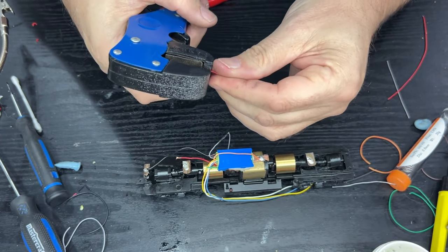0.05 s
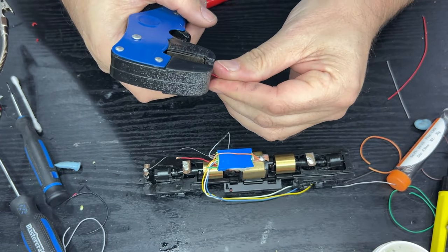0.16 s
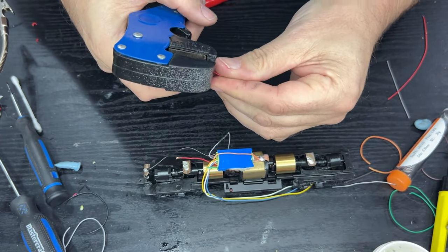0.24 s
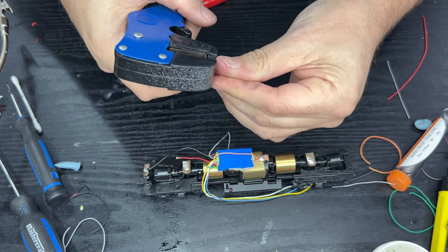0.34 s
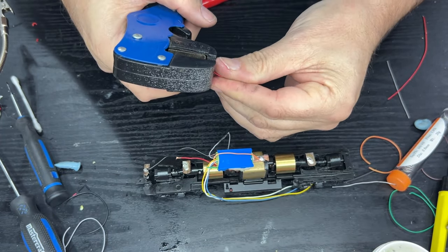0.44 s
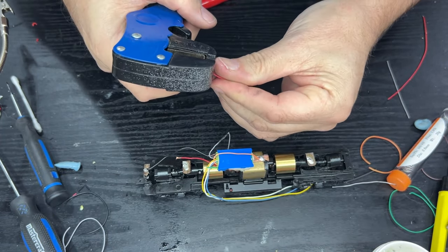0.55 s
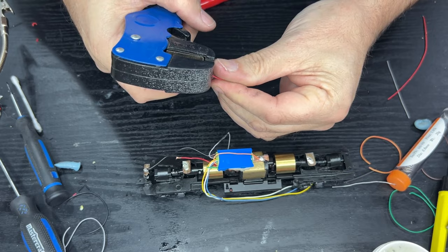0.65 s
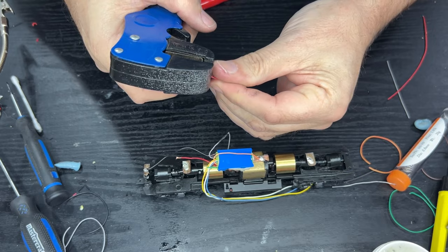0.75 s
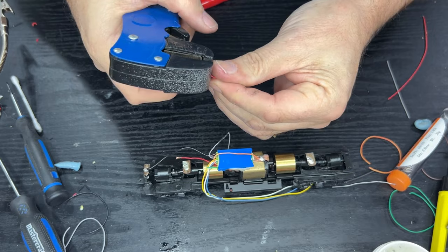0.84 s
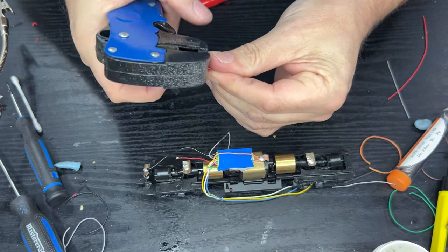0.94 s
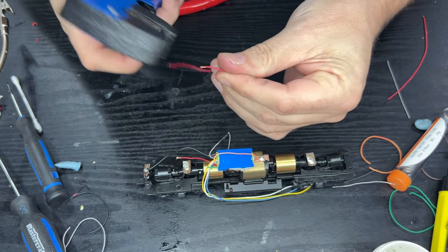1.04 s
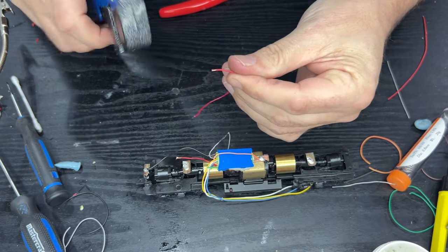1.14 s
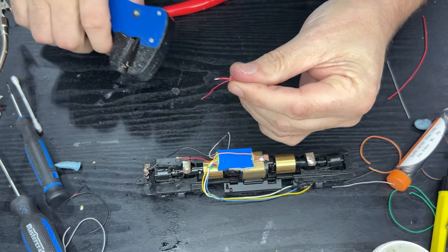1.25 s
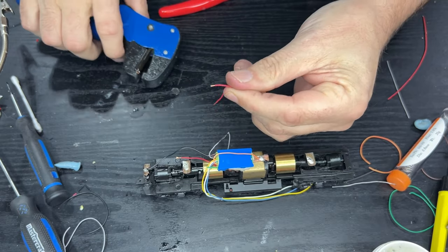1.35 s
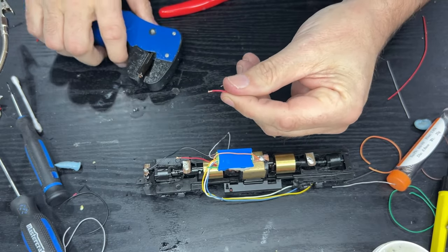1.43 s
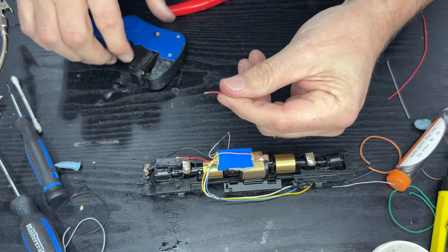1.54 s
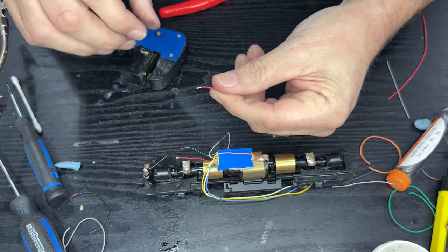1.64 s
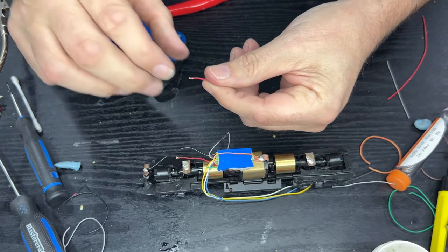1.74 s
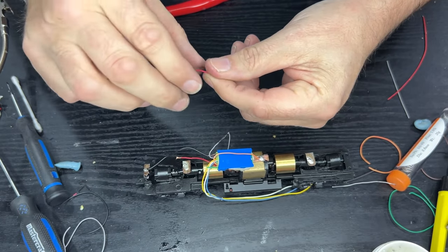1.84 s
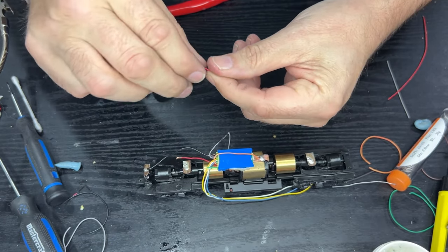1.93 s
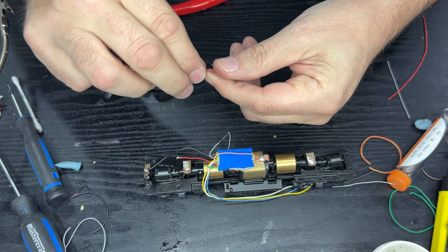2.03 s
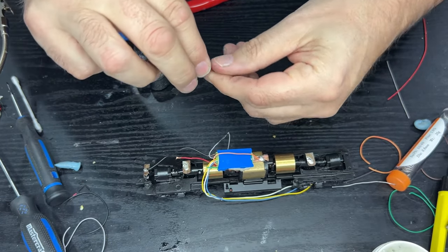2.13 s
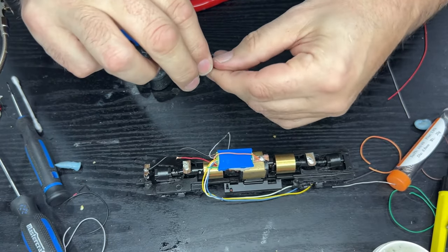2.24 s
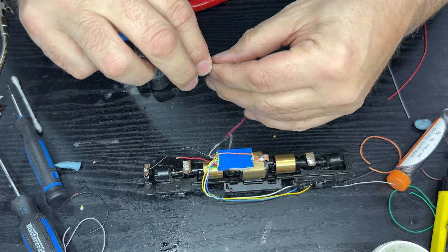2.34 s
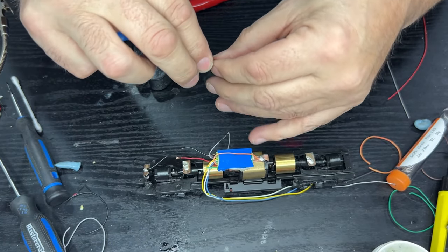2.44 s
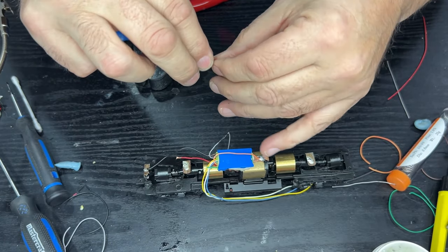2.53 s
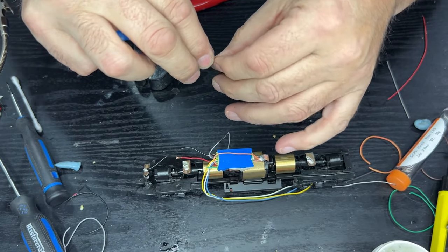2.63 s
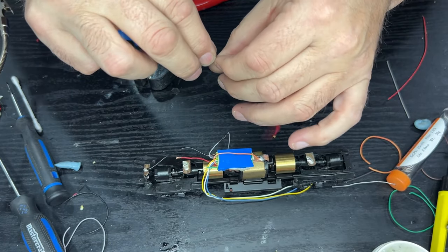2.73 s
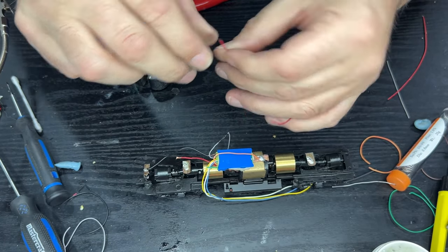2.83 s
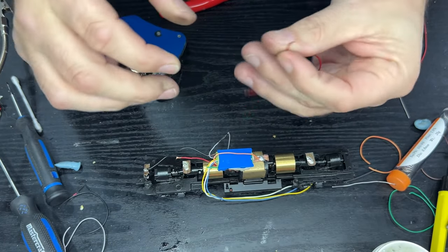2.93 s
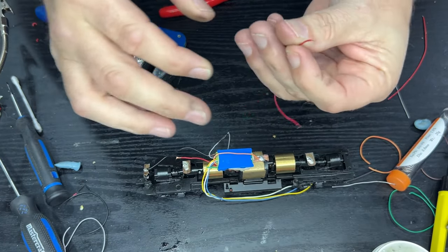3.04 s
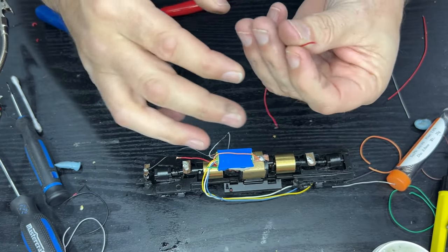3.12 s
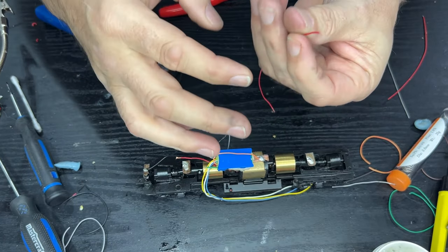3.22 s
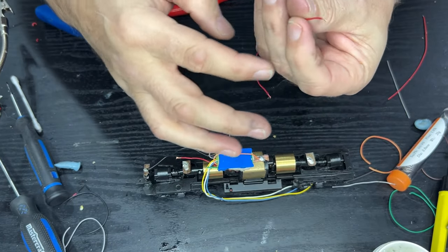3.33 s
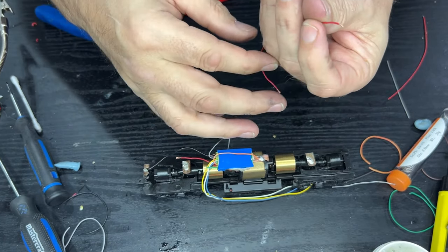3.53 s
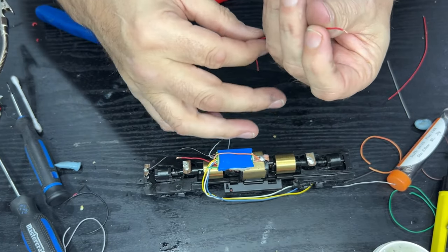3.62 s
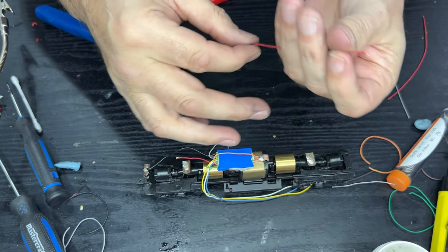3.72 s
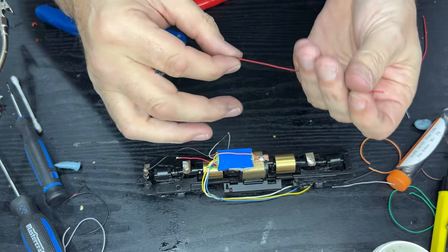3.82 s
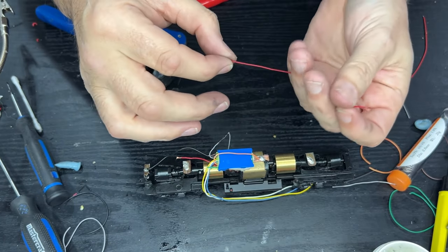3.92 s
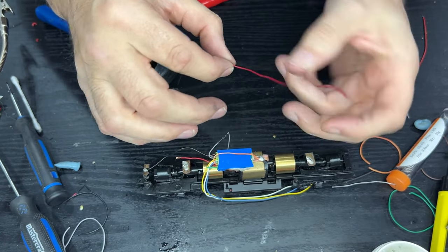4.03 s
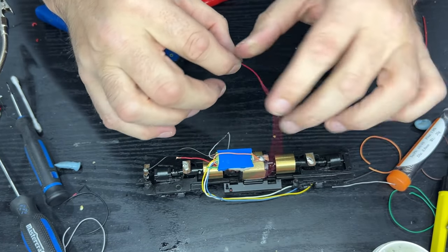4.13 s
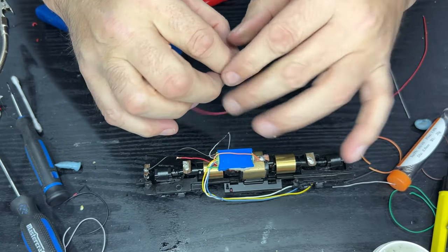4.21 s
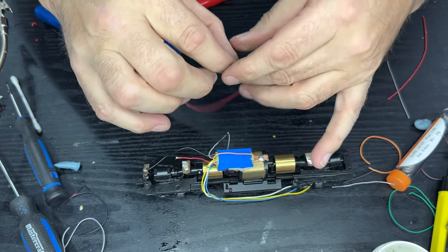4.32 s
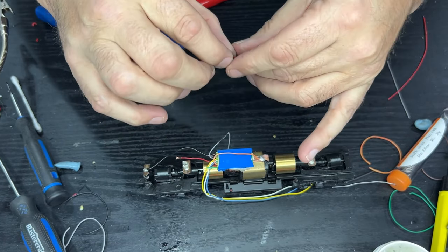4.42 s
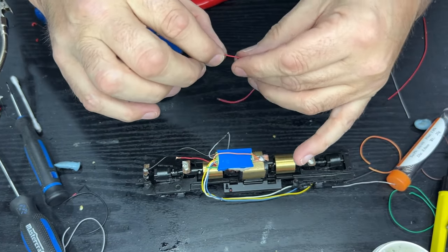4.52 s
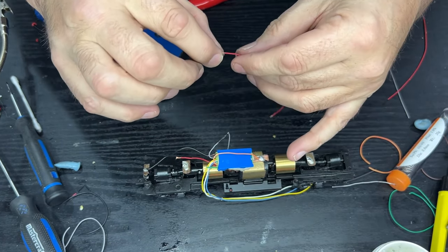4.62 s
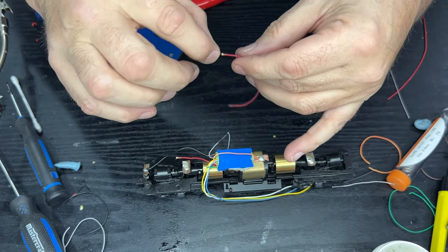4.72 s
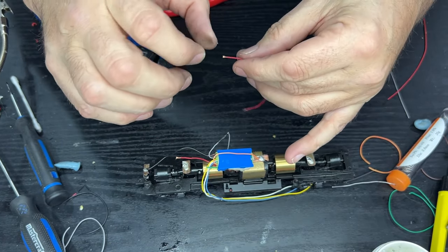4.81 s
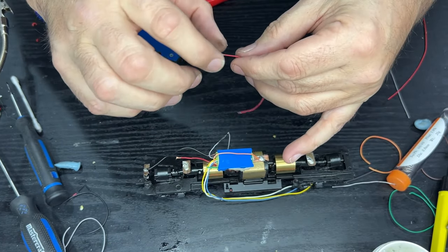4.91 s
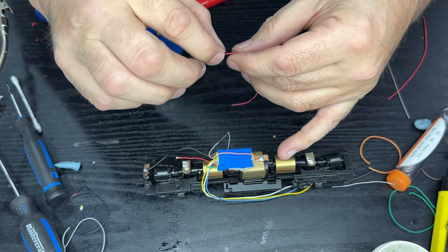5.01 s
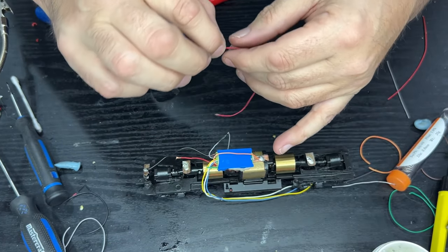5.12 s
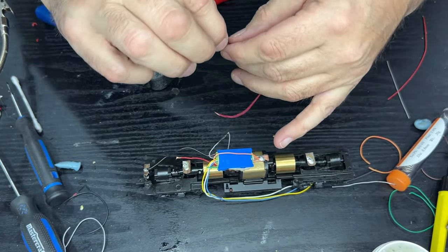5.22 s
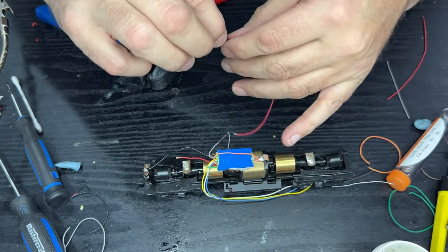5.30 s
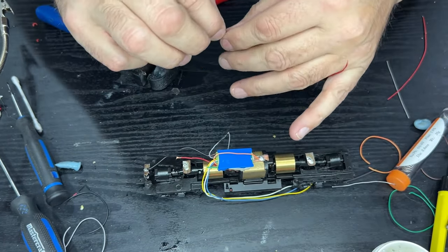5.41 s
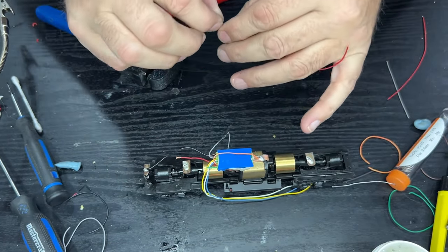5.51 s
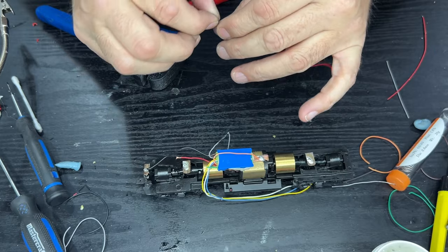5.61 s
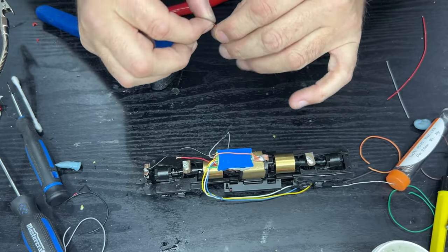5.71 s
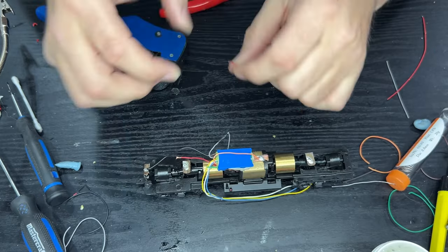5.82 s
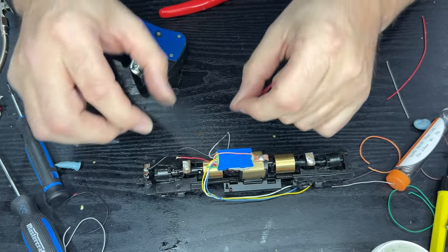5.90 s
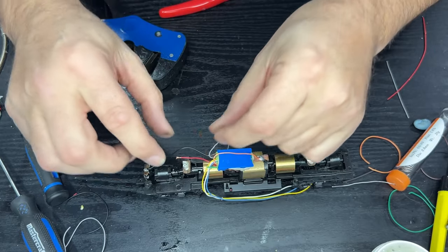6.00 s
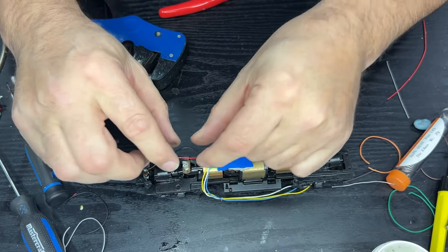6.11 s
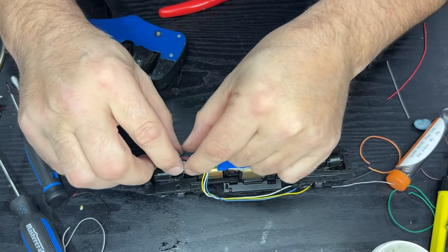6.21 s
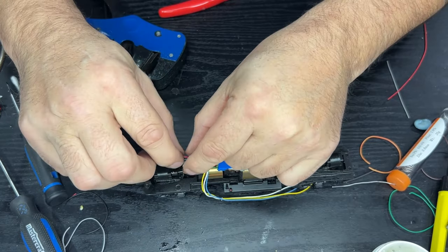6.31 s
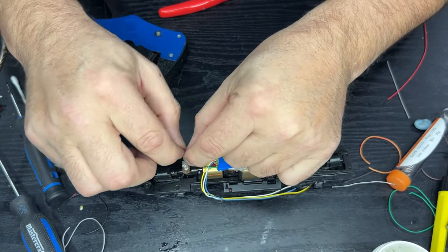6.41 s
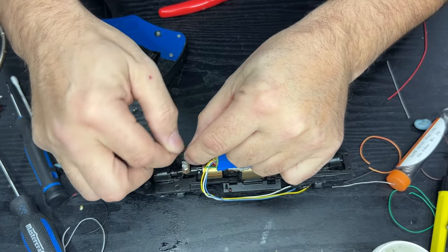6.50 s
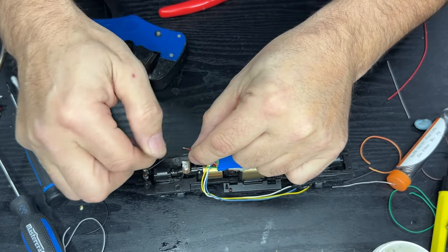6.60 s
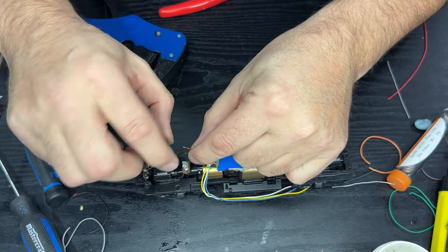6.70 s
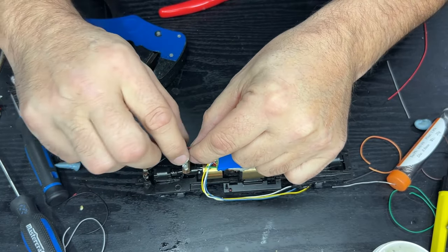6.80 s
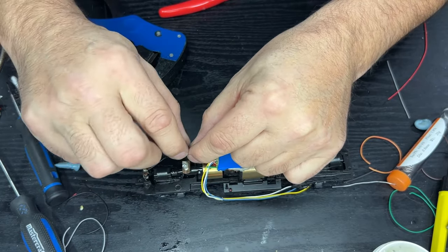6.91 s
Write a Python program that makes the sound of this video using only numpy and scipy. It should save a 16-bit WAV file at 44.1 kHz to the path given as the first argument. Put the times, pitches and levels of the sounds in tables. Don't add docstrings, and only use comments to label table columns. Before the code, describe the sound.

Close stereo pickup at a wooden bench in a small room, with low building rumble and smooth faint hiss throughout. The first 0.65 seconds hold only barely audible arm movement. At about 0.67 a small dull metallic click marks the stripper gripping wire. From 0.8 to 0.9 the jaws crunch in a quick run of ratchet clicks; at 0.96 a stronger metallic clatter follows, then a bright, sharp spring-back snap at 1.05. A soft nudge comes near 1.19. At 1.39 a handle end knocks wood with a small bounce, and at 1.49 the tool lands flat, the loudest clack, rattling rapidly and settling by 1.6 with short room decay. Afterwards it is nearly silent: tiny bright wire ticks around 2.35 and 2.56, fainter ones later, with very soft skin rubs, muffled forearm thumps and scuffs until about 7 seconds.

```python
import sys
import numpy as np
from scipy import signal
from scipy.fft import rfft, irfft, next_fast_len
from scipy.io import wavfile
from scipy.ndimage import map_coordinates

SR = 44100
rng = np.random.default_rng(int(sys.argv[2]) if len(sys.argv) > 2 else 0)


def bounce(signal):
    frames = np.transpose(np.atleast_2d(signal))
    limited = np.clip(frames, -1, 1)
    pcm = np.round(limited * 32767).astype(np.int16)
    wavfile.write(sys.argv[1], SR, pcm)


def ratio(d):
    e = np.asarray(d, float) / 20
    return 10 ** e


N = 306495

# [start_s, peak_db, chatter_ms]
GRIP = [
    (0.668, -55, 4.3),
    (0.6734, -34.5, 1.5),
]
# [start_s, peak_db, blade_over_jaw_db, chatter_ms]
JAW_CONTACTS = [ (.791, -59.5, -1.5, 2.5), (.8, -64.5, -6, 21), (.811, -48, -15, 5), (.8191, -35, -1, 5),
                (.825, -23, -2, 3), (.846, -17.5, -9, 3), (.8634, -20, -5.5, 3), (.8714, -27.5, -24.5, 3),
                (.8804, -24, -22, 3), (.95, -42.5, -4, 5), (.9575, -35, -16, 5), (.9644, -15.5, -9.5, 4.5),
                (.9677, -10.5, -12, 3), (.9712, -14.5, -13.5, 4), (.9744, -21.5, -10.5, 3),
                (.9814, -26, -21.5, 3), (.99, -29, -16, 3), (1.016, -36, -18, 5), (1.042, -34, -10.5, 2),
                (1.0501, -8, -0.5, 1.2), (1.0525, -17.5, -6, 3), (1.0604, -35.5, -9, 3)]
# [start_s, peak_db]
NUDGES = [
    (1.1887, -41.5),
    (1.308, -55),
]
# [pitch_hz, width_hz, level_db]
NUDGE_MODES = [
    [(240, 60, 0), (450, 70, 0)],
    [(550.3, 14, 0)],
]
# [start_s, peak_db, bench_over_heel_db, chatter_ms]
HEEL_CONTACTS = [
    (1.392, -12.5, -8, 2.8),
    (1.4, -20.5, -4.5, 3.6),
]
# [start_s, peak_db, blade_over_handle_db, bench_over_handle_db, chatter_ms]
LANDING = [
    (1.38, -46.5, -12, -10, 15),
    (1.477, -35.5, -3, -21, 12),
    (1.4865, -2.5, -7.5, -18, 3.4),
    (1.4908, -10, -7, -3, 3.7),
    (1.4995, -5, -19.5, -9, 3.6),
]
# [start_s, bench_over_handle_db]
ROCKING = [(1.509, -5), (1.5165, -7), (1.524, -6), (1.5337, 4), (1.543, -2), (1.5556, 2.5), (1.5626, 3),
           (1.57, -2.5), (1.581, 1.5), (1.5885, -4.5), (1.5949, 1), (1.6083, -1.5)]
# [start_s, peak_db, low_over_peak_db, top_over_peak_db]
TICKS = [(1.3013, -50, -19.5, -6.5), (1.3192, -58, -20, -21), (2.3458, -38, -22.5, -19),
         (2.3554, -45.5, -29.5, -17.5), (2.384, -57, -27.5, -6.5), (2.5632, -31, -17, -8.5),
         (2.809, -75.5, -9.5, 3), (3.2009, -56, -26.5, -1.5), (3.4005, -67.5, -1, 1),
         (3.4141, -81, -6, 8.5), (4.7194, -74.5, -5.5, -12), (4.9796, -70, -13.5, -20.5),
         (6.4871, -61, -14.5, -2.5)]
# [start_s, thump_db, dull_scuff_db, bright_scuff_db, contact_ms]
MOVES = [(0.018, -66.5, -95, -78, 132), (0.461, -70, -81.5, -80.5, 24), (1.123, -55, -49.5, -82.5, 28),
         (1.187, -48.5, -52.5, -70, 37), (1.25, -55.5, -58, -71, 82), (1.942, -66.5, -68, -98, 102),
         (2.03, -63, -66.5, -75, 39), (2.515, -56.5, -62.5, -69, 250), (3.08, -55.5, -56.5, -95, 21.7),
         (3.39, -73, -81, -81, 14), (3.76, -67.5, -83.5, -77, 28), (3.959, -58, -64, -83, 61.6),
         (4.28, -57, -63, -79.5, 62), (4.56, -67.5, -87, -85, 113), (4.77, -65.5, -83, -87, 62),
         (4.985, -62.5, -72, -83, 37), (5.57, -60.5, -66.5, -70.5, 65), (5.727, -55, -62.5, -66.5, 53.5),
         (5.985, -60.5, -67, -82, 68), (6.35, -81.5, -82, -79, 97), (6.676, -75, -75.5, -78.5, 37),
         (6.753, -65, -66.5, -95, 23)]
# [start_s, level_db, rise_ms, hold_ms]
RUBS = [(.039, -79, 14, 116), (0.46, -73.5, 2.3, 3), (2.0, -81, 29, 40), (2.07, -72.5, 4.4, 43),
        (3.34, -85.5, 14.2, 93), (3.718, -69.5, 36, 33), (4.23, -86, 32, 57), (4.43, -83.5, 25, 53),
        (5.57, -82.5, 14, 52), (5.735, -72, 15, 43), (6.484, -76.5, 5, 44), (6.66, -77, 14.5, 38)]
# [start_s, level_db, rise_ms, hold_ms]
LEANING = [
    (0, -73, 40, 720),
    (4.33, -69, 42, 452),
]

# [pitch_hz, width_hz, level_db]
CLAMP_MODES = [(720, 300, -14.5), (1500, 320, -5.5), (2112, 450, 1), (3100, 640, -7)]
# [pitch_hz, width_hz, level_db]
JAW_MODES = [(740, 150, -20), (1224, 160, -16), (1950, 320, -8.5), (2386, 160, -4), (2700, 120, -1.5),
             (3313, 300, -7.5), (4440, 600, -15)]
# [pitch_hz, width_hz, level_db]
BLADE_MODES = [(5380, 140, -6), (6230, 800, 0), (7680, 920, 2.5), (8800, 1000, -2.5)]
# [pitch_hz, width_hz, level_db]
TOP_MODES = [(10529, 2300, -2), (12090, 1500, 0), (15000, 840, -6)]
# [pitch_hz, width_hz, level_db]
HEEL_MODES = [(786, 330, -4.5), (1120, 280, 0.5), (1720, 330, -2.5), (2780, 1700, -13), (3860, 1900, -19)]
# [pitch_hz, width_hz, level_db]
HANDLE_MODES = [(1110, 790, -2), (1530, 1000, 1), (2270, 930, 0), (3160, 1420, -6.5), (4160, 1000, -5)]
# [pitch_hz, width_hz, level_db]
BENCH_MODES = [(69, 20, -10.5), (109.67, 34, -11), (165, 16, 0.5), (210, 40, -8), (280.95, 24, 3),
               (344.1, 100, 0.5), (412, 79, -0.5), (520, 98, -2.5), (650, 230, -4.5), (780, 91, -12.5)]
# [pitch_hz, width_hz, level_db]
NAIL_MODES = [(6700, 470, -8.5), (8350, 1200, 1.5), (9270, 900, 1)]
# [pitch_hz, width_hz, level_db]
THUMP_MODES = [(155.5, 66, 0.5), (238, 80, 0.5), (377.4, 140, -4)]
# [pitch_hz, width_hz, level_db]
DULL_MODES = [(470, 88, -2.5), (749, 150, -0.5), (1030, 240, -3), (1399, 610, -8), (1860, 250, -8.5)]
# [pitch_hz, width_hz, level_db]
BRIGHT_MODES = [(1835, 460, -1.5), (2650, 600, -1), (3390, 780, -2.5)]
# [pitch_hz, width_hz, level_db]
HUM_MODES = [(298, 60, 0)]
# [pitch_hz, level_db per Hz]
RUB_SPECTRUM = [(2000, -21), (3500, -9.5), (6400, -1.5), (8300, -5.5), (12000, -10), (13500, -8),
                (15800, -39), (16000, -90)]

# [pitch_hz, level_db per Hz]
FLOOR_MID = [(12, -42.5), (20, -17), (60, 1.5), (155, -10.5), (178, -29), (288, -22.5), (414, -39),
             (450, -31.5), (1590, -40), (1880, -34.5), (3040, -43), (6660, -43.5), (13800, -53),
             (15000, -43.5), (16400, -53.5)]
# [pitch_hz, level_db per Hz]
FLOOR_SIDE = [(12, -45), (20, -15), (184, 5.5), (223, -12.5), (280, -7.5), (350, -15), (477, -8),
              (596, -14.5), (909, -13.5), (1680, -27.5), (2430, -27.5), (5170, -32), (6660, -45),
              (15000, -22.5), (16400, -28)]
# [start_s, level_db]
RUMBLE = [(0.0, -61), (1.12, -61), (1.55, -51), (1.82, -57), (2.38, -64), (2.77, -54.5), (2.92, -64),
          (3.35, -58.5), (3.5, -65.5), (4.61, -59), (4.92, -61.5), (5.85, -60), (6.06, -63.5), (6.95, -60)]
# pitch_hz, width_hz, level_db
LAMP = (14800, 91, -91)
# [pitch_hz, t60_s]
ROOM_DECAY = [(100, 0.36), (500, .35), (2000, .42), (6000, 0.36), (10000, 0.3), (15000, .2)]
# [pitch_hz, gain_db]
ROOM_GAIN = [(100, -11), (400, -8.5), (1500, -11), (4000, -9.5), (8000, -14.5), (11500, -19), (12800, -23),
             (15000, -26)]
# [pitch_hz, side_over_mid_db]
WIDTH = [(60, -28), (150, -24), (380, -6), (700, 0), (1300, -2), (2400, -5), (5300, -1.5), (6600, -10),
         (7800, -5), (10000, -0.5), (11500, 5), (12800, 13), (15000, 16)]
# [pitch_hz, left_over_right_db]
PORT_LEVEL = [(60, 0.0), (110, -0.5), (200, -2), (380, 0.5), (700, -3.5), (1290, -2), (2380, 1),
              (4400, 1.5), (8120, 0.0), (15000, -0.5)]
# [pitch_hz, left_lead_rad]
PORT_PHASE = [(100, -0.5), (3800, 0.31), (4800, -2), (5800, 2), (7500, -0.5), (9200, -1.5), (10500, -2),
              (12500, -2), (14000, -2.5), (16000, -2.5)]


def tool():
    track = np.zeros((2, N + SR))
    for s, db, ms in GRIP:
        add(track, s, ms, [(CLAMP_MODES, db)])
    for (s, db), modes in zip(NUDGES, NUDGE_MODES):
        add(track, s, 4, [(modes, db)])
    contacts = []
    for s, db, blade, ms in JAW_CONTACTS:
        top_db = db - 1.5 + 0.63 * blade
        bench_db = -48.5 + 0.34 * db
        contacts.append((s, ms, JAW_MODES, db, db + blade, top_db, bench_db))
    # every 15 ms, 5.5 dB weaker
    shiver = [(1.413 + k * 0.015, -34.5 - k * 5.5, 6.5, 4.987) for k in range(3)]
    for s, db, bench, ms in [*HEEL_CONTACTS, *shiver]:
        contacts.append((s, ms, HEEL_MODES, db, db - 22.5, db - 27.5, db + bench + 1))
    for s, db, blade, bench, ms in LANDING:
        contacts.append((s, ms, HANDLE_MODES, db, db + blade, db + blade - 2, db + bench + 4.5))
    for s, bench in ROCKING:
        db = -15 - 10 * ((s - ROCKING[0][0]) / 0.078) ** 2
        contacts.append((s, 4.1, HANDLE_MODES, db, db - 15, db - 37, db + bench + 2.5))
    for s, ms, struck, db, blade_db, top_db, bench_db in contacts:
        parts = [(struck, db + 0.5), (BLADE_MODES, blade_db + 5.5)]
        parts += [(TOP_MODES, top_db), (BENCH_MODES, bench_db)]
        add(track, s, ms, parts)
    return track[:, :N]


def ticks():
    track = np.zeros((2, N + SR))
    for s, db, low_db, top_db in TICKS:
        low = ([(3690, 430, 0)], db + low_db + 8.5)
        add(track, s, 2.5, [(NAIL_MODES, db + 0.5), low, (TOP_MODES, db + top_db + 13.5)])
    return track[:, :N]


def hands():
    scuff_fade_ms, thump_fade_ms, rub_fade_ms = 210, 130, 160
    start_s, thump_db, dull_db, bright_db, contact_ms = np.transpose(MOVES)

    def strokes(fade_ms):
        return np.array([stroke(s, 0.19 * ms, 0.81 * ms, fade_ms) for s, ms in zip(start_s, contact_ms)])

    def resonant(modes, lumpy_db):
        return diffuse(lambda hz: body(modes)(hz) ** 2, lumpy_db)

    fidget = ratio(-76.5 + 5 * wobble(7))
    weight = ratio(thump_db) @ strokes(thump_fade_ms) + fidget
    thump = weight * resonant(THUMP_MODES, 2)
    scuff = strokes(scuff_fade_ms)
    dull = ratio(dull_db) @ scuff * resonant(DULL_MODES, 0.43)
    bright = ratio(bright_db) @ scuff * resonant(BRIGHT_MODES, -1.3)
    rubbing = sum(ratio(db) * stroke(s, rise, hold, rub_fade_ms) for s, db, rise, hold in RUBS)
    rub = rubbing * diffuse(lambda hz: ratio(along(RUB_SPECTRUM, hz)), 1.5)
    load = sum(ratio(db) * stroke(s, rise, hold, scuff_fade_ms) for s, db, rise, hold in LEANING)
    hum = load * resonant(HUM_MODES, 7)
    return thump + dull + bright + rub + hum


def room(x):
    hz, t, z = signal.stft(rng.standard_normal((2, SR * 3 // 4)), SR, nperseg=256)
    t60 = along(ROOM_DECAY, hz)[:, None]
    z = z * ratio(-60 * t / t60) / np.sqrt(t60)
    tail = signal.istft(z, SR, nperseg=256)[1]
    tail *= 1 - np.exp(-np.arange(tail.shape[1]) / SR / 0.00022)
    wet = signal.fftconvolve(x[None], tail / np.linalg.norm(tail[0]), axes=1)[:, :N]
    wet[1] = filtered(wet[1], lambda hz: hz ** 4 / (hz ** 4 + 200 ** 4))
    return filtered(wet, lambda hz: ratio(along(ROOM_GAIN, hz) + [hz * 0, along(WIDTH, hz)]))


def floor():
    start_s, level_db = np.transpose(RUMBLE)
    rumble_db = np.interp(np.arange(N) / SR, start_s, level_db)
    swell = ratio(rumble_db + 64 + 1.5 * wobble(5.7))
    noise = rng.standard_normal((2, N))
    pair = filtered(noise, lambda hz: (hz < 15900) * ratio([along(FLOOR_MID, hz), along(FLOOR_SIDE, hz)]))
    pair = np.array([ratio(-61) * unit(pair[0]), ratio(-67.5) * unit(pair[1])])
    low = filtered(pair, lambda hz: 1 / (1 + (hz / 200) ** 4))
    pair[1] += ratio(LAMP[2]) * unit(filtered(rng.standard_normal(N), body([LAMP])))
    return pair + (swell - 1) * low


def add(track, s, ms, parts):
    t = np.arange(SR // 8) / SR
    u = t / (np.array([[max(ms, 0.2)], [ms + 9]]) / 1000)
    first = round(s * SR)
    for modes, db in parts:
        uneven = ratio(2.7 * rng.standard_normal(u.shape))
        chatter = u * np.exp(-2.5 * u) * rng.standard_normal(u.shape) * uneven
        if modes is BENCH_MODES:
            chatter[0] = t * np.exp(-t / 0.0002)
        near = filtered(chatter[0], body(modes))
        blurred_modes = [(hz, 3 * width, level) for hz, width, level in modes]
        sent = filtered(chatter[1], body(blurred_modes))
        ring = np.array([near, sent * np.linalg.norm(near) / np.linalg.norm(sent)])
        track[:, first:first + len(t)] += ratio(db) * ring / np.abs(near).max()


def body(modes):
    def response(f):
        total = 0
        for k, (pitch, width, db) in enumerate(modes):
            damping = 1j * f * width
            total = total + (-1) ** k * ratio(db) * damping / (pitch * pitch - f * f + damping)
        return total
    return response


def stroke(s, rise, hold, fade):
    t = (np.arange(N) / SR - s) * 1000
    return np.clip(t / rise, 0, 1) ** 2 * ratio(-60 * np.clip(t - rise - hold, 0, None) / fade)


def diffuse(response, lumpy_db):
    noise = rng.standard_normal((2, N)) * ratio(lumpy_db * wobble(70))
    mid, side = filtered(noise, lambda hz: response(hz) * [hz * 0 + 1, ratio(along(WIDTH, hz))])
    return np.array([mid, side]) / np.std(mid)


def wobble(rate):
    knots = rng.standard_normal(int(N * rate / SR) + 4)
    return map_coordinates(knots, [np.arange(N) * rate / SR])


def filtered(x, response):
    n = x.shape[-1]
    m = next_fast_len(n + 8192)
    return irfft(rfft(x, m) * response(np.fft.rfftfreq(m, 1 / SR)), m)[..., :n]


def along(points, hz):
    f, v = np.transpose(points)
    return np.interp(np.log(hz + 1), np.log(f + 1), v)


def unit(x):
    return x / np.sqrt(np.mean(x ** 2) + 1e-20)


def scene():
    near, sent = tool() + ticks()
    early = np.arange(N) < 1.36 * SR
    mid, side = room(sent * early) + room(sent * ~early) + hands() + floor()

    def ports(hz):
        level = ratio(along(PORT_LEVEL, hz) * [[0.5], [-0.5]])
        return level * np.exp(0.5j * along(PORT_PHASE, hz) * [[1], [-1]])

    return filtered(near, ports) + [mid + side, mid - side]


def band_limit(x):
    return signal.sosfilt(signal.butter(12, 16500, fs=SR, output="sos"), x)


def record(dry):
    held = dry / (1 + np.abs(dry / 0.92) ** 6) ** (1 / 6)
    held = filtered(held, lambda hz: (hz < 16500) * hz ** 3 / (hz ** 3 + 34.0 ** 3))
    low_side = filtered((held[0] - held[1]) / 2, lambda hz: 0.85 / (1 + (hz / 200) ** 4))
    return band_limit(held - [low_side, -low_side])


dry = scene()
out = record(dry)
bounce(out)
```